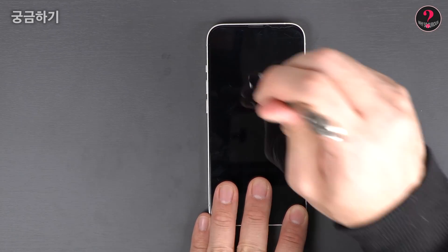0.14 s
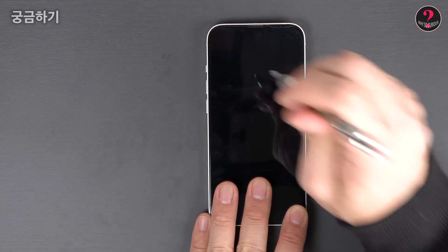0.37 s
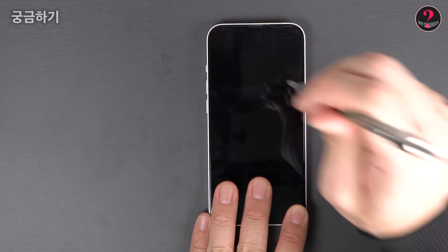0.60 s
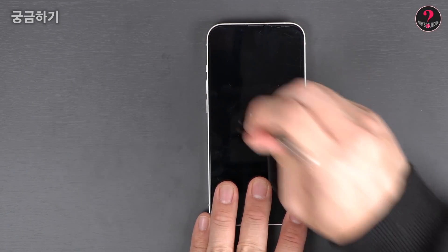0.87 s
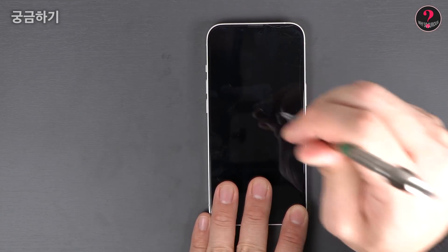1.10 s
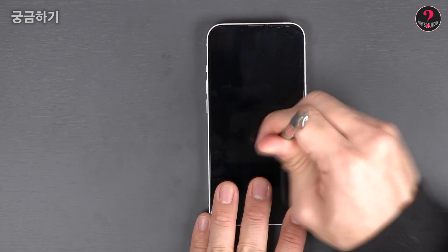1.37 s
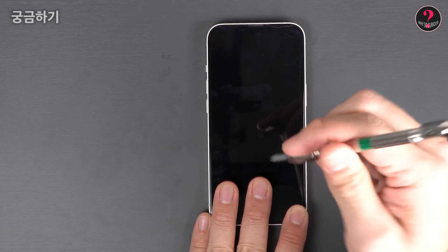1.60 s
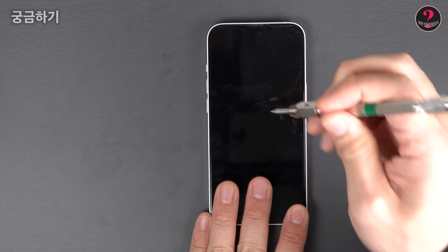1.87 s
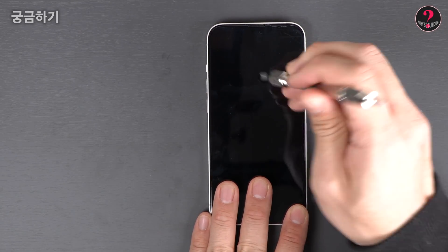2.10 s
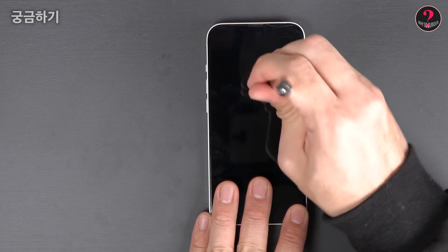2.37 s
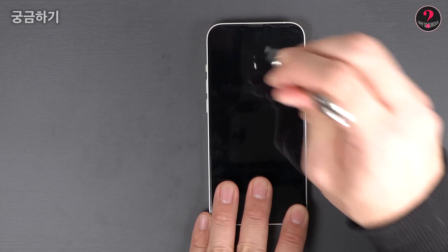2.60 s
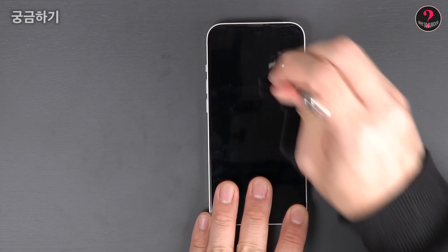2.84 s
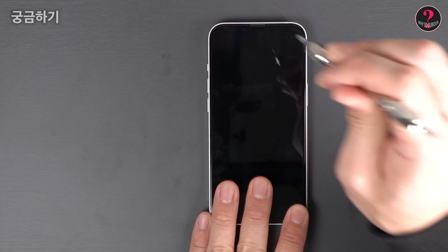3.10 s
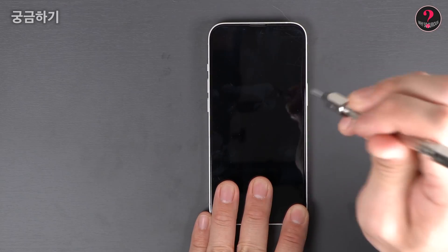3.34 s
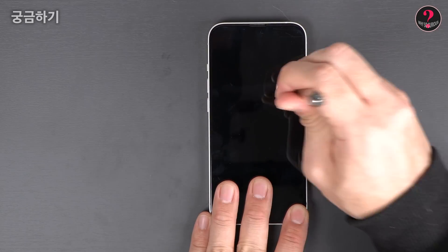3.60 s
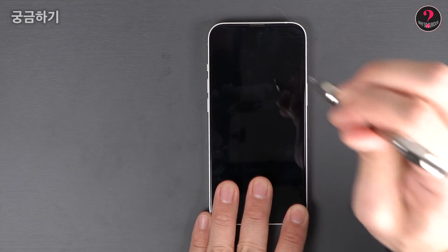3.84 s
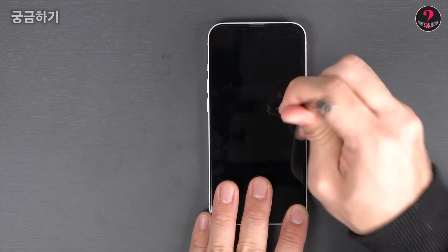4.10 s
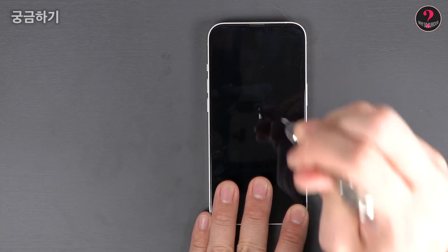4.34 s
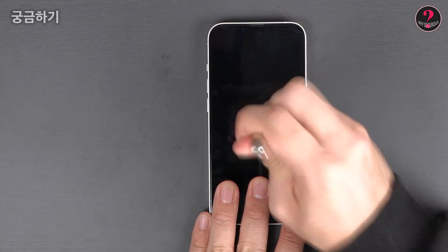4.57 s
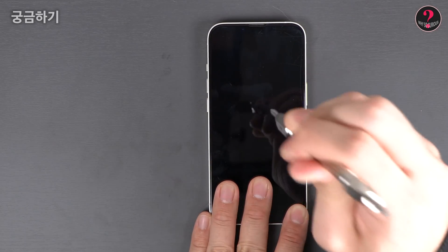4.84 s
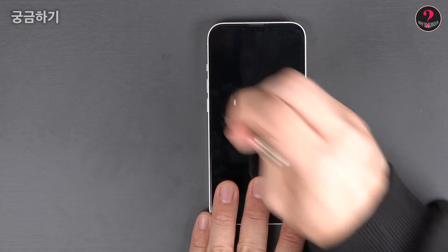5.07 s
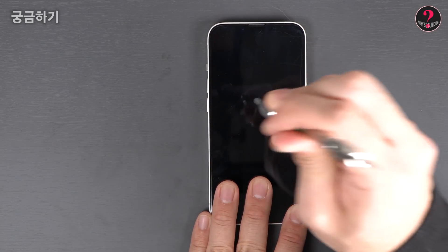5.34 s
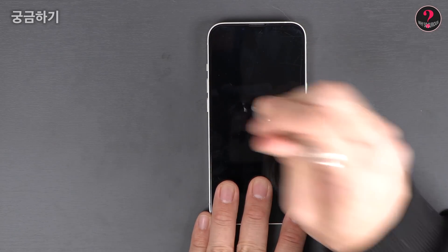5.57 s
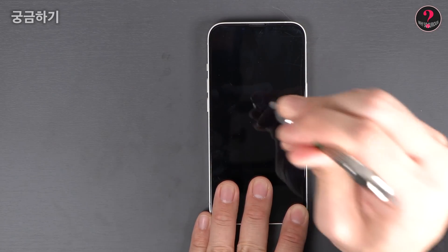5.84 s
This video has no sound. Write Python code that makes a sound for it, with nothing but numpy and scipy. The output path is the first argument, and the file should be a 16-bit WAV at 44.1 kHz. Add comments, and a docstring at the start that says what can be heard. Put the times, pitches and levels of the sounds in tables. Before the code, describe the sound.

A hard steel point knocks sharply on a phone's glass about twice a second in a small hard room, with two short gaps.

```python
"""Taps on a phone's glass

A steel pick taps the glass of a phone lying on a table in a small, hard room. Each short knock is a sum
of damped modes with a noise crack; it excites the room's low modes and a dense tail of shaped noise.
A clink of steel modes and two soft low pushes fall between taps; hum and filtered hiss fill the pauses.
A gain control flattens the first tenth of a second of each knock."""
import sys
import numpy as np
from scipy import signal
from scipy.io import wavfile
from scipy.ndimage import uniform_filter1d

SR = 44100
rng = np.random.default_rng(int(sys.argv[2]) if len(sys.argv) > 2 else 0)


def natural_amplitude(level_db):
    """Convert a level in decibels to a linear amplitude factor, elementwise."""
    exponent = np.asarray(level_db, float) / 20
    return 10 ** exponent


def to_wav(s):
    """Save 16-bit WAV."""
    ch = np.atleast_2d(s).T  # columns
    pcm = np.round(np.clip(ch, -1, 1) * 32767)  # PCM
    wavfile.write(sys.argv[1], SR, pcm.astype(np.int16))


N = 262395  # samples


def read(points, hz):
    """Linear interpolation on a logarithmic frequency axis."""
    point_hz, value = np.transpose(points)
    return np.interp(np.log(hz + 1), np.log(point_hz + 1), value)


def add(mix, start_s, sound):
    """Superposition: sums a sound into the mix at its start time, cut to the length of the mix."""
    at = round(start_s * SR)
    sound = sound[..., max(-at, 0):]
    part = mix[:, max(at, 0):][:, :sound.shape[-1]]
    part += sound[..., :part.shape[1]]


def ring(modes, gains, seconds, rise_cycles=.05):
    """Modal synthesis: exponentially decaying sines, each swelling over some of its own cycles."""
    hz, db, t60 = np.transpose(modes)[:, :, None]
    t = np.arange(round(seconds * SR)) / SR
    swell = 1 - np.exp(-t * hz / rise_cycles)
    decay = natural_amplitude(db - 60 * t / t60)
    return (gains[:, None] * swell * decay * np.sin(2 * np.pi * hz * t)).sum(0)


def chance(count):
    """Complex Gaussian statistics: two unrelated random short-time spectra."""
    re, im = rng.standard_normal((2, 2, count, 257)).transpose(0, 1, 3, 2)
    return re + 1j * im


# left-right likeness of a noise field: pitch_hz, likeness (0 to 1)
LIKENESS = [(60, 0.99), (180, 1), (550, 0.94), (1650, 0.64), (4970, 0.077), (15000, 0.24)]
# channel balance: pitch_hz, left_over_right_db
BALANCE = [(500, 0), (2500, -0.5), (6000, 0), (15000, -2)]


def stereo(field):
    """Partial coherence: left and right share part of the field, returned as sound."""
    hz = np.fft.rfftfreq(512, 1 / SR)[:, None]
    same = np.clip(read(LIKENESS, hz), 0, 1)
    side = natural_amplitude(read(BALANCE, hz) / 2)
    left = field[0] * side
    right = (same * field[0] + np.sqrt(1 - same ** 2) * field[1]) / side
    return signal.istft(np.array([left, right]), nperseg=512, noverlap=384)[1]


# colour shared by all taps: pitch_hz, level_db
TAP_COLOUR = [(600, -0.77), (1000, -2.5), (2000, -3.2), (4000, -3.34), (6500, 0.06)]
BEND_IN_ROOM = 0.29  # share of bend_db that colours everything near the lowest phone mode


def tint(hz, blow):
    """Excitation spectrum: strength, struck spot and hardness set the gain at each frequency."""
    strength_db, boom_db, band_hz, lift_db, bend_db = blow
    boom_knee_hz, half_width_octaves = 170, .5
    hard_knee_hz, hard_slope, usual_db = 3000, 0.32, -18  # slope in dB per dB over the usual strength

    def bell(centre_hz):
        return np.exp(-(np.log2((hz + 1) / centre_hz) / half_width_octaves) ** 2)

    boom = boom_db / (1 + (hz / boom_knee_hz) ** 4)
    favoured = lift_db * bell(band_hz)
    bend = BEND_IN_ROOM * bend_db * bell(PHONE_MODES[0][0])
    # a harder blow is brighter above the knee
    hardness = hard_slope * (strength_db - usual_db) / (1 + (hard_knee_hz / (hz + 1)) ** 4)
    return natural_amplitude(strength_db + read(TAP_COLOUR, hz) + boom + favoured + bend + hardness)


# short ring of the held-down phone: pitch_hz, level_db, t60_s
PHONE_MODES = [(1053, 15, 0.0085), (1940, 4.5, 0.0067), (2365, -3, 0.011), (3620, -12.5, 0.013),
               (4470, -11.5, .014), (6800, -19, 0.0062)]


def knock(blow):
    """Modal excitation: the struck spot decides how much each phone mode gets."""
    hz, bend_db = np.array(PHONE_MODES)[:, 0], blow[-1]
    # together with the tint, the lowest mode gets twice bend_db
    lowest_db = (2 - BEND_IN_ROOM) * bend_db * (hz == hz.min())
    spot_db = 3.7 * rng.standard_normal(len(hz))
    return -ring(PHONE_MODES, tint(hz, blow) * natural_amplitude(lowest_db + spot_db), 1, rise_cycles=1.8)


def crack(strength_db):
    """Impact noise: a broadband burst, partly shared by the channels, decays exponentially."""
    t = np.arange(SR) / SR
    level_db, t60_s = -20, .022
    noise = rng.standard_normal(SR) + 0.91 * rng.standard_normal((2, SR))
    press = 1 - np.exp(-t / .0005)  # the tip takes a moment to press in
    return noise * natural_amplitude(strength_db + level_db - 60 * t / t60_s) * press


# the table top gives under the blow: pitch_hz, level_db, t60_s
THUD = [(188, -12, .03), (287, -5.5, 0.022)]


def thud(blow):
    """Damped resonance: the table top answers with two low modes."""
    return -ring(THUD, tint(np.array(THUD)[:, 0], blow), 1, rise_cycles=.9)


# table and room, before a common gain and a limit on decay: pitch_hz, level_db, t60_s
ROOM_MODES = [(49, -12, .7), (80.7, -16.5, 1), (118, -16, 0.41), (141.8, 1.5, 0.77), (180.6, -13, 0.8),
              (225.6, -1.5, 0.7), (234.8, -2.5, 0.5), (248, 0, 0.59), (283.8, 8, 0.38), (294.8, -5, 0.71),
              (309.5, 4, 0.24), (355.5, -6.5, 0.46), (397, -4, 0.13), (454.4, -0.5, 0.59),
              (437.8, -18.5, 0.43), (542, -8.5, 0.63), (631, -8.5, 0.45), (618, -15.5, 0.42),
              (659.6, 5, 0.27), (681, 2.5, .35), (729, -4, 0.76), (816, -7.5, 0.56), (924, -7, 0.78),
              (960, -16.5, 0.7), (922, -8.5, .4), (1000, -4, 0.09), (1110, -2.5, 0.32), (1200, -12, 0.41),
              (1373, -2, 0.52), (1520, -6, 0.1)]


def room_modes(blow, signs):
    """Normal modes: table and room ring on at their own frequencies."""
    hz = np.array(ROOM_MODES)[:, 0]
    # the struck spot matters most to the high modes
    spot_db = 2.6 * np.minimum(hz / 900, 1) * rng.standard_normal(len(hz))
    # no mode outlasts the room's own decay by much
    damped = [(f, db, min(t60, 1.15 * read(TAIL_T60, f))) for f, db, t60 in ROOM_MODES]
    return natural_amplitude(-15.5) * ring(damped, signs * tint(hz, blow) * natural_amplitude(spot_db), 1, rise_cycles=0.81)


# spectrum of the tail, before a common gain: pitch_hz, level_db (per Hz)
TAIL = [(60, -35), (150, -21.5), (330, -12), (600, -12), (1000, -9), (1700, -13), (2500, -20),
        (3300, -25.5), (4600, -28), (5500, -32.5), (9000, -40), (15300, -42), (16500, -74.5)]
# decay of the room: pitch_hz, t60_s
TAIL_T60 = [(60, 0.99), (150, 0.74), (300, 0.56), (1000, 0.58), (2500, 0.48), (5000, 0.44), (10000, 0.49),
            (15000, 0.19)]
# likeness of the tail from tap to tap: pitch_hz, likeness (0 to 1)
REPEATS = [(300, .9), (1000, .7), (2500, .45), (6000, .2)]


def room_tail(blow, usual):
    """Diffuse reverberation: a random field decays at a rate set by frequency."""
    hz, frame_s = np.fft.rfftfreq(512, 1 / SR)[:, None], np.arange(usual.shape[2]) * 128 / SR
    alike = read(REPEATS, hz)
    field = alike * usual + np.sqrt(1 - alike ** 2) * chance(count=usual.shape[2])
    level_db = -5 + read(TAIL, hz) - 60 * frame_s / read(TAIL_T60, hz)
    tail = stereo(field * tint(hz, blow) * natural_amplitude(level_db))[:, :SR]
    # reflections need some milliseconds to fill in
    return (1 - np.exp(-np.arange(SR) / SR / 0.0033)) * tail


def tap(blow, signs, usual):
    """Impact response: direct sound plus the modes and tail of the room."""
    # knock and crack are a little louder on the right
    direct = (knock(blow) + crack(blow[0])) * natural_amplitude([[-.9], [.9]])
    return direct + thud(blow) + room_modes(blow, signs) + room_tail(blow, usual)


# the struck spot favours or starves one band and bends the phone more or less:
# start_s, strength_db, boom_db (low end), band_hz (centre), lift_db (of the band),
# bend_db (half the gain of the lowest phone mode)
TAPS = [(0.057, -17, 2, 2300, 5.5, -2.5), (0.4922, -17, -4, 2600, 5.5, -0.5),
        (0.9483, -17.5, 2.5, 1200, 1.5, 1), (1.3927, -19.5, 0.3, 543, 3.5, -0.5),
        (2.3467, -22.5, 3, 2100, 4.5, -14.5), (2.9098, -15, -6, 650, 1, -6),
        (3.5892, -19, 0.5, 1600, -2.5, -4), (4.1097, -17.5, 0.5, 610, 5, -2),
        (4.6323, -18, 1.1, 1000, 1.5, 0), (5.1525, -16.5, 3.5, 1340, 1.5, -3.5),
        (5.6723, -16.5, 2.3, 1410, 1, -0.2)]
# a tap whose tail still hangs in the air at the start, same columns
EARLIER_TAP = (-0.6366, 3.5, -6.5, 1500, 2.5, .1)


def taps(mix):
    """Repeated excitation: every blow meets the same modes and a partly repeating tail."""
    # neighbouring modes reach the microphone in opposite polarity
    signs = (-1.) ** np.arange(len(ROOM_MODES))
    usual = chance(count=SR // 128 + 5)
    for start_s, *blow in [EARLIER_TAP] + TAPS:
        add(mix, start_s, tap(blow, signs, usual))


# the pick's loose steel part: start_s, level_db
CLINKS = [(1.736, -76.5)]
# its modes: pitch_hz, level_db, t60_s
STEEL = [(4300, -3.5, .06), (6100, -2, 0.11), (7144, -3, .12), (10450, -4, 0.092), (14450, -7, .1),
         (14910, -7, .15)]


def clinks(mix):
    """Free vibration: lightly damped high modes of a small steel part."""
    for start_s, level_db in CLINKS:
        add(mix, start_s, natural_amplitude(level_db) * ring(STEEL, np.ones(len(STEEL)), .3))


# the resting hand nudges the table: start_s, level_db (before the envelope), pitch_hz
BUMPS = [(5.599, -48.5, 96), (5.645, -50.5, 109)]


def bumps(mix):
    """Heavily damped oscillation: a soft, low push that dies within a few cycles."""
    t = np.arange(SR // 10) / SR
    envelope = np.e * t / 0.008 * np.exp(-t / 0.0062)
    for start_s, level_db, pitch_hz in BUMPS:
        add(mix, start_s, natural_amplitude(level_db) * np.sin(2 * np.pi * pitch_hz * t) * envelope)


# hum lines: pitch_hz, level_db (rms before wavering)
HUM = [(134.6, -82.5), (242.2, -90.5), (360.7, -76), (419.9, -95.5)]


def hum():
    """Amplitude modulation: steady tones waver slightly in level."""
    t, out = np.arange(N) / SR, np.zeros(N)
    for pitch_hz, level_db in HUM:
        waver = uniform_filter1d(rng.standard_normal(N), 4000) * 18
        tone = np.sin(2 * np.pi * (pitch_hz * t + rng.random()))
        out += np.sqrt(2) * natural_amplitude(level_db) * (1 + waver) * tone
    return out


# spectral shape of hiss and rumble: pitch_hz, level_db (per Hz, relative)
AIR = [(18, -57.5), (30, -29), (75, -9.5), (124, -21), (161, -22), (295, -30.5), (328, -16.5), (364, -10.5),
       (394, -24.5), (473, -31), (1500, -44), (16000, -49)]


def hiss():
    """Stationary coloured noise: steady hiss and rumble, scaled to a set rms."""
    hz = np.fft.rfftfreq(512, 1 / SR)[:, None]
    noise = stereo(chance(count=N // 128 + 5) * natural_amplitude(read(AIR, hz)))[:, :N]
    return natural_amplitude(-76) * noise / noise.std()


def scene():
    """Superposition of taps, small noises, hum and hiss."""
    mix = hiss() + hum()
    taps(mix)
    clinks(mix)
    bumps(mix)
    return mix


def top_cut(x):
    """Nothing passes above the cut-off."""
    return signal.sosfilt(signal.butter(12, 16790, fs=SR, output="sos"), x)


def record(dry):
    """Dynamic compression: gain drops just after each knock and climbs back; then a band limit."""
    power_db = 10 * np.log10(abs(uniform_filter1d((dry ** 2).mean(0), 130)) + 1e-12)
    fall = np.arange(N) * 300.0 / SR  # the held peak falls 300 dB a second
    held_db = np.maximum.accumulate(power_db + fall) - fall
    over_db = np.maximum(held_db + 33.0, 0)  # excess over -33 dB
    lag = np.exp(-1 / (0.0016 * SR))  # the first cycles slip through before the gain is down
    smooth_db = signal.lfilter([1 - lag], [1, -lag], over_db)
    ducked = dry / natural_amplitude(.5 * smooth_db)  # half the excess is taken off
    edge = signal.firwin(129, 16000, window=("kaiser", 8), fs=SR)
    return top_cut(signal.oaconvolve(ducked, edge[None], "same"))


dry = scene()
out = record(dry)
to_wav(out)
```